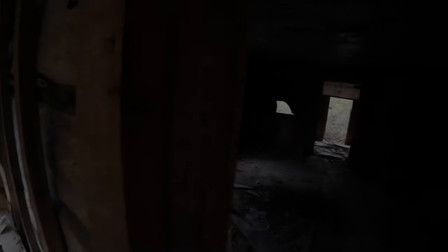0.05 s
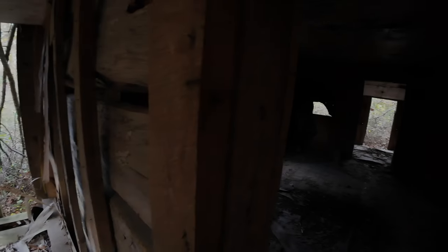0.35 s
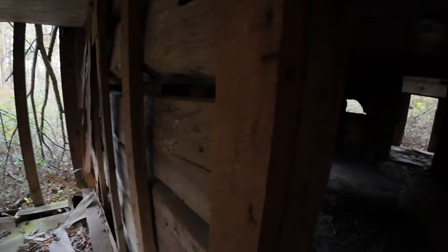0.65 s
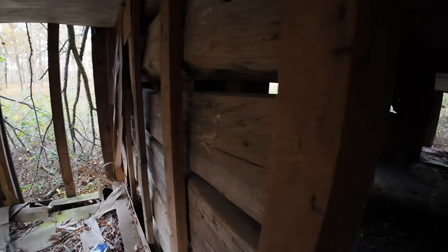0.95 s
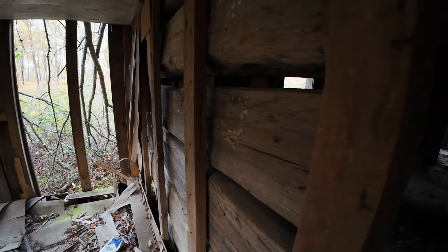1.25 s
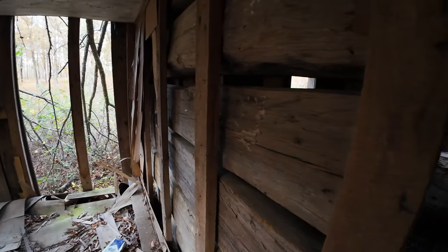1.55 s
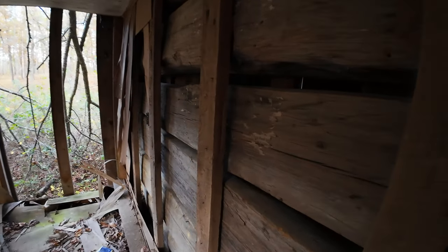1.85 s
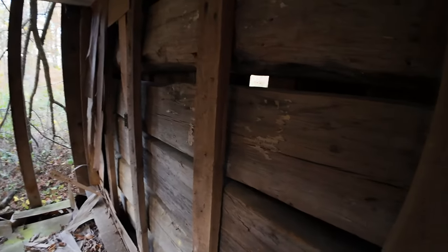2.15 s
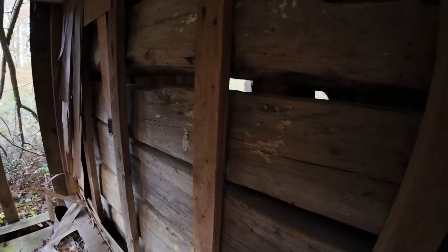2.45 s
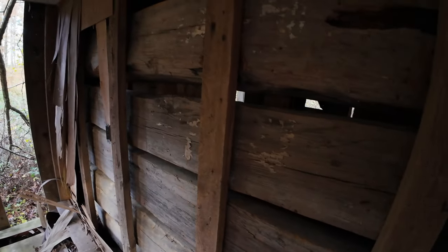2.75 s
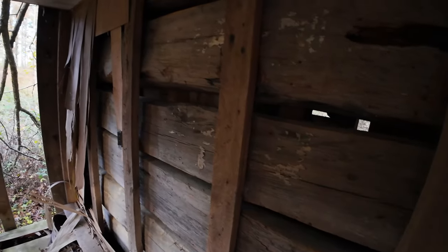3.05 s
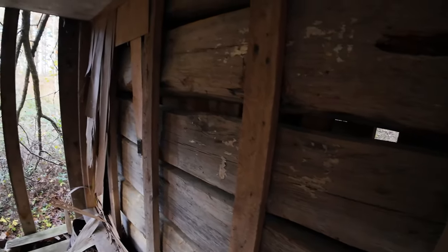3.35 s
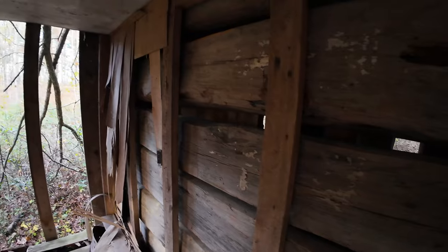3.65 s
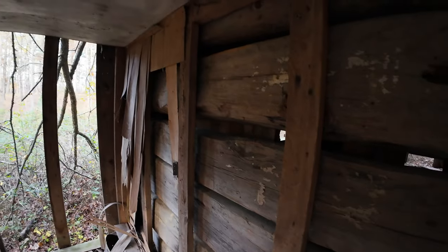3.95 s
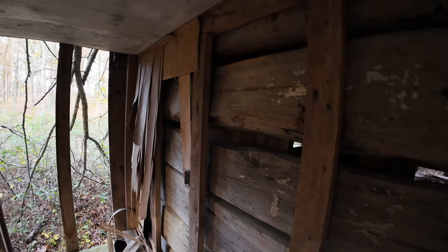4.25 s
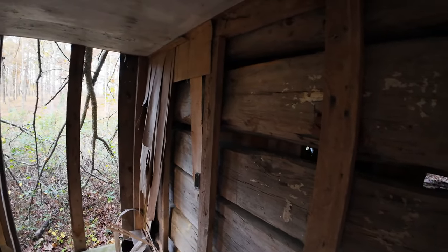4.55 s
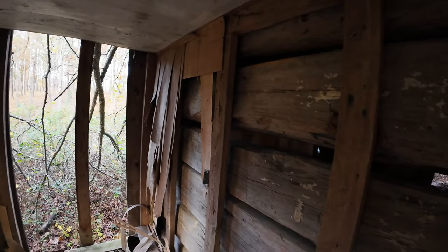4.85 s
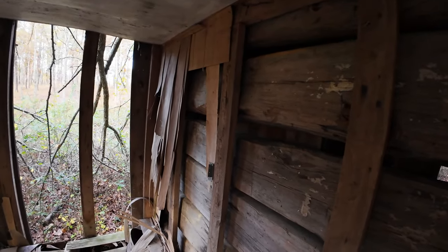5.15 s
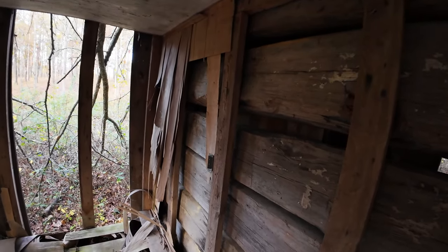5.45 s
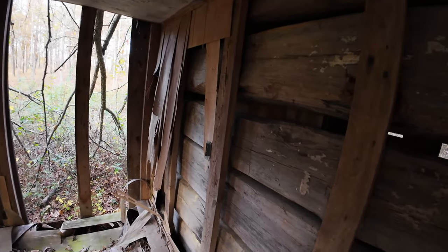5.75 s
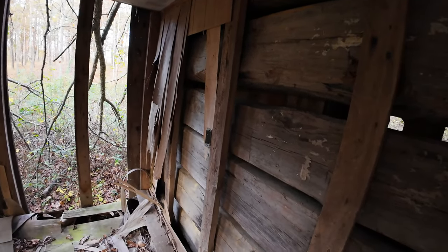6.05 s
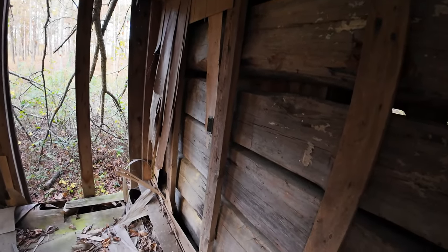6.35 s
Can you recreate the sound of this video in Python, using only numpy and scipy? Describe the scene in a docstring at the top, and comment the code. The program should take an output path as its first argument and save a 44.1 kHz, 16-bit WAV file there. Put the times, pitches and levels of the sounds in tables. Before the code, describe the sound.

Footsteps move over loose boards and dry litter, close to the microphone in a small derelict wooden room with a short echo. Soft thuds and knocks open, then a board cracks sharply at about 0.4 seconds. From 1.2 to 1.6 seconds a sole scrapes and crunches, with small splinters snapping. The loudest crack comes at 1.8 seconds, with a deep thud from the sagging floor. A sharp snap follows at 2.4 seconds, then a cluster of scuffs, hollow knocks, thuds and snaps from 2.7 to 3.3 seconds. After that the walker stands still. What remains is the quiet of the woods outside: soft moving air and faint insects rasping in threes over a distant insect chorus. A far animal clucks very faintly at about 3.9, 4.9 and 5.8 seconds, and a tiny insect peeps from 5.3 seconds until the end, just after 6 seconds.

```python
"""Footsteps on loose boards, close to a stereo pair of microphones inside a derelict wooden house.
Two boards crack against the joists, the sprung floor thuds and slats knock; soles scrape over wood
and dry litter and splinters snap, all with a short echo off the plank walls of the small open room.
Then the walker stands still, leaving the woods beyond the open wall: moving air, insects
rasping over a distant choir, a faint one peeping, and a far animal that clucks three times."""
import sys
import numpy as np
from scipy import signal
from scipy.fft import rfft, irfft, next_fast_len
from scipy.io import wavfile
from scipy.ndimage import uniform_filter1d

SR = 44100
rng = np.random.default_rng(int(sys.argv[2]) if len(sys.argv) > 2 else 0)


def dump(signal):
    """Clip the signal to [-1, 1] and save it as 16-bit WAV at the path in sys.argv[1]."""
    limited = np.clip(np.atleast_2d(signal).T, -1, 1)
    pcm = np.round(limited * 32767).astype(np.int16)
    wavfile.write(sys.argv[1], SR, pcm)


N = 281701
TIME = np.arange(N) / SR

# Loose boards slapping down. Each row: start in seconds, strength of the slap in dB, room echo and
# floor ring in dB relative to the slap, rebound delay in seconds.
BOARD_CRACKS = [(0.426, -4, -2.5, -31, .0035), (1.773, 1, -3, -24.5, .0038)]
# Colour of the first and the second slap. Each row: frequency in Hz, relative level in dB.
FIRST_SLAP_COLOUR = [(60, -21.5), (170, -26), (310, -9.5), (430, -7), (620, -1), (900, -1), (1150, -7.5),
                     (2000, -8.5), (3000, -14), (5500, -20), (7200, -28.5), (10000, -33), (14000, -31.5),
                     (16000, -41.5)]
SECOND_SLAP_COLOUR = [(60, -22), (160, -29.5), (260, -10), (400, -14), (560, -10), (880, -1.5), (1350, -10),
                      (2000, -15.5), (2800, -14.5), (5000, -21), (7000, -38.5), (10000, -31), (13500, -39),
                      (16000, -38.5)]
# Floorboard modes. Each row: frequency in Hz, relative level in dB, seconds to fall 60 dB.
FLOOR_MODES = [(195, -16, .3), (244, -15, .3), (534, -10, .26), (636, -10, .22), (805, -2, .24),
               (890, -2, .2), (988, -5, .22), (1070, -7, .17), (1215, -7, .2), (1416, -9, .18),
               (1541, -10, .22), (1995, -12, .2), (2426, -14, .2), (3612, -17, .18)]
# Weight landing on the sprung floor. Each row: start in seconds, level in dB, pitch in Hz.
FLOOR_THUDS = [(0.016, -41.5, 118), (0.067, -37, 116), (0.424, -38, 94), (1.255, -45, 134),
               (1.772, -27.5, 87), (1.801, -27, 45.6), (1.898, -32.5, 56.4), (2.14, -44, 63),
               (2.393, -33.5, 94.6), (2.897, -33.5, 65), (2.946, -38, 72.5)]
# Slats and sticks underfoot. Each row: start in seconds, peak in dB, lowest mode in Hz.
SLAT_KNOCKS = [(0.013, -39, 510), (0.067, -37.5, 405), (0.079, -35.5, 270), (0.123, -40.5, 1200),
               (0.164, -43.5, 718), (2.141, -50.5, 320), (2.396, -39.5, 650), (2.473, -40, 1090),
               (2.766, -38.5, 710), (2.896, -30.5, 552), (3.009, -35, 917), (3.122, -43.5, 2090)]
# Modes of a slat. Each row: multiple of the lowest mode, relative level in dB.
SLAT_MODES = [(0.998, -0.5), (1.27, -3), (2.199, -5), (2.901, -7), (4.4, -9.5)]
# Single sharp snaps. Each row: start in seconds, peak in dB, pitch in Hz, tearing time in seconds.
SPLINTER_SNAPS = [(0.0668, -34, 2870, 0.0012), (1.413, -34.5, 7800, 0.0046), (1.459, -35.5, 2900, 0.0031),
                  (1.481, -35, 4200, 0.0022), (1.5625, -30, 3860, 0.0014), (1.567, -39, 5400, 0.0024),
                  (1.598, -31.5, 3580, 0.0025), (2.136, -44.5, 3030, 0.0031), (2.4018, -21, 2376, 0.0015),
                  (2.4725, -34.5, 2480, 0.002), (2.757, -38.5, 4090, 0.0034), (2.7665, -32.5, 4900, 0.0046),
                  (2.87, -27, 5500, 0.0036), (2.916, -29.5, 1840, 0.0045), (2.9565, -33, 5800, 0.0051),
                  (3.0085, -33, 2840, 0.0053), (3.0476, -31.5, 10600, 0.0065),
                  (3.0688, -31.5, 4820, 0.0026), (3.1745, -35.5, 4400, 0.0053),
                  (3.2014, -28.5, 9550, 0.003), (3.294, -36, 4560, 0.0095)]
# A sole catching on a board. Each row: start and length in seconds, pitch in Hz, level in dB.
SOLE_DRAGS = [(0.0, 0.05, 1480, -55), (1.341, 0.1, 1500, -61), (1.42, 0.13, 859, -61),
              (1.5, 0.11, 2800, -59), (2.776, 0.074, 573, -49)]
# A sole presses, holds and lets go. Each row: start, swell and hold in seconds, rub on wood and
# crunch of litter in dB, weight on the foot from 0 to 1.
SOLE_STROKES = [ (0.0, 0.025, 0.016, -47.5, -67, 0.94), (0.056, 0.01, 0.073, -54, -63.5, 0.97),
                (0.663, 0.08, 0.018, -60.5, -83, 0.92), (1.17, 0.14, 0.016, -65, -66.5, 0.46),
                (1.313, 0.043, 0.076, -60.5, -54, 0.1), (1.42, 0.049, 0.12, -56, -53, 0.04),
                (1.633, 0.02, 0.22, -64, -67, 0), (1.856, 0.034, 0.056, -55, -73, 0.88),
                (1.988, 0.033, 0.29, -68.5, -79, 0.98), (2.36, 0.042, 0.001, -45, -65, 0.4),
                (2.451, 0.0094, 0.028, -55.5, -57.5, 0.9), (2.735, 0.043, 0.08, -45.5, -46.5, 0.38),
                (2.828, 0.051, 0.035, -40, -44, 0.47), (2.945, 0.054, 0.024, -54, -56, 0.15),
                (3.11, 0.016, 0.013, -60.5, -55, 0.64), (3.193, 0.008, 0.035, -59, -51.5, 0),
                (3.277, 0.026, 0.014, -56.5, -57, 0.4)]
# Wood rubbed by a heavy and a light foot. Each row: resonance and its width in Hz, relative gain in dB.
HEAVY_RUB_MODES = [(278, 110, -3.5), (604, 100, 2.5), (960, 250, -1), (1370, 450, -6), (2430, 690, -10)]
LIGHT_RUB_MODES = [(318.6, 160, -2.6), (845, 51, 0.68), (1420, 280, 0.59), (2705, 270, 1),
                   (3897, 400, -0.96)]
# Dry leaves and grit. Each row: frequency in Hz, relative spectral level in dB.
LITTER_COLOUR = [(500, -14.5), (1500, -7.5), (2700, -6.5), (4200, 2), (5500, 7.5), (7000, -1.5), (8200, 3),
                 (10000, 4.5), (11800, -2), (13600, 6.5), (15000, -4), (16200, -33)]
# Three-syllable rasping phrases of a near insect and a fainter one.
# Each row: middle of the first syllable in seconds, level in dB.
RASP_PHRASES = [(0.087, -66.5), (1.168, -63.5), (2.2, -64), (2.65, -65.5), (3.74, -70.5), (4.329, -63),
                (4.853, -65.5), (5.06, -77.5), (5.393, -67), (5.887, -66.5)]
# The three syllables of a phrase. Each row: delay in seconds, accent in dB.
RASP_SYLLABLES = [(0, -3.5), (.058, -1.5), (0.128, -1.5)]
# The far animal. Each entry: time of a cluck in seconds.
CLUCK_TIMES = [3.93, 4.886, 5.763]
# Woodland air and the far insect choir. Each row: frequency in Hz, relative spectral level in dB.
AIR_COLOUR = [(25, 6), (55, -5.5), (75, -9.5), (130, -14.5), (200, -23), (500, -27.5), (1000, -32.5),
              (2500, -37), (5700, -39.5), (7000, -46.5), (10000, -45), (11500, -52.5), (13500, -45.5),
              (16000, -54)]
CHOIR_COLOUR = [(3300, -21), (3750, -3), (4200, 3), (4450, 0.5), (4700, -25.5)]
# How alike the two microphones hear the foot, the room and the outdoors.
# Each row: frequency in Hz, left-right correlation.
FOOT_CORRELATION = [(2400, 1), (4500, .85), (8000, .35), (13000, .1)]
ROOM_CORRELATION = [(600, .985), (1200, .95), (2400, .87), (4500, .52), (8000, .1), (13000, -.15)]
AIR_CORRELATION = [(60, 0.02), (300, 0.21), (4000, 0.25), (8000, 0.02)]
# Echo of the plank room. Each row: frequency in Hz, seconds to fall 60 dB.
ROOM_DECAY = [(80, 0.75), (250, 0.28), (600, 0.2), (1200, 0.225), (3000, 0.24), (10000, 0.21)]
# Colour of the microphone pair. Each row: frequency in Hz, left minus right in dB.
MIC_BALANCE = [(1000, 0.5), (2000, 0.05), (4500, 2.5), (9000, -2), (13000, -3.5)]


def board_cracks(rebound_db=-4.5, dull_hz=2200, splinter_hz=5500, chatter_s=0.0032):
    """A nearby board slaps the joist and rebounds; splinters chatter, the floor and the room ring."""
    out, t = np.zeros((2, N)), seconds(.7)
    colours = [FIRST_SLAP_COLOUR, SECOND_SLAP_COLOUR]
    for (s, slap_db, room_db, ring_db, rebound_s), colour in zip(BOARD_CRACKS, colours):
        # bending waves carry the treble ahead of the bass
        slap = signal.lfilter([-.8, 1], [1, -.8], response(colour))
        slap = from_db(slap_db) * slap / np.abs(slap).max()
        add(out, s, filtered(slap, "low", splinter_hz))
        add(out, s + rebound_s, from_db(rebound_db) * filtered(slap, "low", dull_hz))
        # the treble comes from many tiny contacts within a few milliseconds
        contacts = stereo_noise(len(t), ROOM_CORRELATION) * np.exp(-t / chatter_s)
        chatter = rms_one(contacts) / np.sqrt(len(t))
        add(out, s, through(filtered(slap, "high", splinter_hz), chatter))
        add(out, s, room_echo(slap, room_db, build_s=0.0081))
        for hz, mode_db, t60 in FLOOR_MODES:
            # the ring swells as the blow spreads along the boards
            swell = rng.choice([-1, 1]) * (1 - np.exp(-t / 0.0057))
            gain = from_db(slap_db + ring_db + mode_db + rng.normal(0, 0.83))
            add(out, s, gain * swell * ring(t, hz, t60))
    return out


def floor_thuds(press_s=0.006, wobble=0.1, rumble_db=-3, t60_cycles=12):
    """The floor sags under a soft sole and swings unevenly; the loose boards around it rumble along."""
    out, t = np.zeros((2, N)), seconds(1)
    for s, level_db, hz in FLOOR_THUDS:
        uneven_time = np.cumsum(1 + wobble * wander(len(t), smooth=600)) / SR
        rumble = rms_one(resonance(rng.standard_normal(len(t)), hz, quality=.9))
        swing = np.sin(2 * np.pi * hz * uneven_time) + from_db(rumble_db) * rumble
        envelope = from_db(level_db - 60 * t * hz / t60_cycles) * (1 - np.exp(-t / press_s))
        add(out, s, envelope * swing)
    return out


def slat_knocks(t60_at_1khz_s=0.051, contact_s=0.00032):
    """A slat is struck and rings briefly and hollowly; small ones ring higher and shorter."""
    out, t = np.zeros(N), seconds(.15)
    for s, peak_db, lowest_hz in SLAT_KNOCKS:
        knock = 0
        for multiple, mode_db in SLAT_MODES:
            hz = lowest_hz * multiple
            gain = from_db(mode_db + rng.normal(0, 1.5)) * rng.choice([-1, 1])
            knock = knock + gain * ring(t, hz, t60_at_1khz_s / np.sqrt(hz / 1000))
        knock = knock * (1 - np.exp(-t / contact_s))
        add(out, s, from_db(peak_db) * knock / np.abs(knock).max())
    return out + room_echo(out, level_db=-6, build_s=.004)


def splinter_snaps(rows, fibres_db=4, full_grit_hz=4577, grit_db_per_octave=15.5):
    """A splinter tears fibre by fibre within milliseconds: a broad resonance plus bright grit."""
    out, t = np.zeros((2, N)), seconds(.03)
    litter = response(LITTER_COLOUR)[:len(t)]
    for s, peak_db, hz, tear_s in rows:
        fibres = from_db(fibres_db * wander(len(t), smooth=20))
        tear = stereo_noise(len(t), FOOT_CORRELATION) * fibres * np.exp(-t / tear_s)
        body = rms_one(resonance(tear, hz, quality=0.98))
        grit = rms_one(through(tear, litter)[:, :len(t)])
        # smaller splinters are higher and grittier
        grit_db = min(grit_db_per_octave * np.log2(hz / full_grit_hz), 0)
        snap = body + from_db(grit_db) * grit
        add(out, s, from_db(peak_db) * snap / np.abs(snap.mean(axis=0)).max())
    return out + room_echo(out, level_db=-5, build_s=0.0026)


def random_splinters(crunch, per_s=24, threshold_db=-49, above_crunch_db=12, spread_db=4.5,
                     centre_hz=3220, tear_s=0.0054):
    """Splinters snap at random where the sole crunches hardest; rows as in SPLINTER_SNAPS."""
    at = np.flatnonzero((rng.random(N) < per_s / SR) & (crunch > from_db(threshold_db)))
    size, octaves = rng.standard_normal((2, N))[:, at]
    peak_db = 20 * np.log10(crunch[at]) + above_crunch_db + spread_db * size
    hz = np.minimum(centre_hz * 2 ** octaves, SR / 4)
    return list(zip(at / SR, peak_db, hz, np.full(len(at), tear_s)))


def sole_drags(waver=.035):
    """Quick uneven slips set one board ringing; it swells, wavers and fades as the sole passes."""
    out = np.zeros(N)
    for s, length_s, hz, level_db in SOLE_DRAGS:
        t = seconds(length_s)
        slipping = rng.standard_normal(len(t)) * (rng.random(len(t)) < hz / SR)
        uneven_time = np.cumsum(1 + waver * wander(len(t), smooth=600)) / SR
        tone = np.interp(uneven_time, t, resonance(slipping, hz, quality=6), right=0)
        add(out, s, from_db(level_db) * rms_one(tone * np.sin(np.pi * t / length_s)))
    return out + room_echo(out, level_db=-8, build_s=0.0023)


def sole_scuffs(heavy, light, crunch):
    """Close to the microphones, the sole stutters over wood and crushes dry leaves and grit."""
    heavy_rub = rubbed_wood(slips(per_s=1400, size_db=0.5), HEAVY_RUB_MODES)
    light_rub = rubbed_wood(slips(per_s=4000, size_db=-0.5), LIGHT_RUB_MODES)
    leaves = rms_one(through(slips(per_s=2800, size_db=2.8), response(LITTER_COLOUR)))
    direct = heavy * heavy_rub + light * light_rub + crunch * leaves
    return direct + room_echo(direct, level_db=-10, build_s=0.00061)


def stroke_gains(rub_t60_s=0.11, crunch_t60_s=0.125):
    """Heavy rub, light rub and crunch over time; weight shifts the rub to the deeper resonances."""
    heavy, light, crunch = np.zeros((3, N))
    for s, swell_s, hold_s, rub_db, crunch_db, weight in SOLE_STROKES:
        rub = from_db(rub_db) * pressure(s, swell_s, hold_s, rub_t60_s)
        heavy += np.sqrt(weight) * rub
        light += np.sqrt(1 - weight) * rub
        crunch += from_db(crunch_db) * pressure(s, swell_s, hold_s, crunch_t60_s)
    return heavy, light, crunch


def pressure(s, swell_s, hold_s, t60):
    """Gain of one stroke: a smooth swell, a hold and an exponential release."""
    rise = np.sin(np.pi / 2 * np.clip((TIME - s) / swell_s, 0, 1)) ** 2
    return rise * from_db(-60 * np.clip((TIME - s - swell_s - hold_s) / t60, 0, 10))


def slips(per_s, size_db, clump_db=2.6):
    """Tiny stereo clicks of uneven size, coming in clumps as the sole catches and lets go."""
    shape = (2, next_fast_len(N))
    sizes = from_db(size_db * np.minimum(rng.exponential(1, shape), 4)) * rng.choice([-1, 1], shape)
    clumps = from_db(clump_db * rms_one(uniform_filter1d(rng.standard_normal(shape[1]), size=260)))
    slipping = rng.random(shape) < per_s / SR
    return spread(clumps * sizes * slipping, FOOT_CORRELATION)[:, :N]


def rubbed_wood(clicks, modes, drift_db=2.5):
    """Parallel resonances of alternating sign, each coming and going as the contact moves; rms 1."""
    out = 0
    for k, (hz, width_hz, db) in enumerate(modes):
        gain = (-1) ** k * from_db(db + drift_db * wander(N, smooth=2200))
        out = out + gain * signal.lfilter(*signal.iirpeak(hz, hz / width_hz, fs=SR), clicks)
    return rms_one(out)


def insects(peeps_from_s=5.32, peep_every_s=.215, peep_db=-79, far_per_s=9.7):
    """A near insect and a fainter one rasp in threes, a higher one peeps, far ones call at random."""
    syllables = [(s + delay_s, db + accent_db)
                 for s, db in RASP_PHRASES for delay_s, accent_db in RASP_SYLLABLES]
    rasps = calls(syllables, hz=4370, length_s=.046, fall=.29, top_at=.35, waver=.007)
    peep_rows = [(peeps_from_s + k * peep_every_s, peep_db) for k in range(5)]
    peeps = calls(peep_rows, hz=5200, length_s=0.018, fall=.08, top_at=0.44, waver=0.0045)
    far_s = np.flatnonzero(rng.random(N) < far_per_s / SR) / SR
    far_db = rng.normal(-81.5, 4.5, len(far_s))
    far_rasps = calls(zip(far_s, far_db), hz=4280, length_s=.046, fall=.2, top_at=.35, waver=.02)
    return rasps + peeps + far_rasps


def animal_clucks(level_db=-65):
    """An animal far off in the woods gives three short, falling notes."""
    rows = [(s, level_db) for s in CLUCK_TIMES]
    return calls(rows, hz=1050, length_s=.03, fall=.15, top_at=-.2, waver=.006)


def calls(rows, hz, length_s, fall, top_at, waver):
    """Short fluttering tones on an arch of pitch whose top lies at the fraction top_at of each call."""
    out, t = np.zeros(N), seconds(length_s)
    along = t / length_s
    swell = np.sin(np.pi * along) ** 1.4
    for middle_s, level_db in rows:
        glide = fall * rng.uniform(.8, 1.2) * (along - top_at) ** 2
        pitch = hz * (1 - glide + waver * (rng.normal() + wander(len(t), smooth=60)))
        tone = np.sqrt(2) * np.sin(2 * np.pi * np.cumsum(pitch) / SR)
        flutter_db = 2 * wander(len(t), smooth=200)
        add(out, middle_s - length_s / 2, from_db(level_db + flutter_db) * swell * tone)
    return out


def woods(air_db=-55.5, lean_left_db=1, choir_db=-81):
    """Single callers, a far insect choir and moving air reach the microphones through the open wall."""
    callers = insects() + animal_clucks()
    echo = room_echo(callers, level_db=-7, build_s=0.0056)
    choir = from_db(choir_db) * outdoor_noise(CHOIR_COLOUR)
    air = from_db([[air_db + lean_left_db], [air_db - lean_left_db]]) * outdoor_noise(AIR_COLOUR)
    return callers + echo + choir + air


def outdoor_noise(colour):
    """Steady coloured noise, wide between the microphones; rms 1."""
    size = next_fast_len(N)
    gain = from_db(at_hz(colour, np.fft.rfftfreq(size, 1 / SR)))
    return rms_one(irfft(rfft(stereo_noise(size, AIR_CORRELATION)) * gain, size)[:, :N])


def room_echo(sound, level_db, build_s, size=32768):
    """Dense echoes off the plank walls build up quickly and die band by band."""
    t, hz = np.arange(size) / SR, np.fft.rfftfreq(size, 1 / SR)
    white = rfft(stereo_noise(size, ROOM_CORRELATION))
    centres, t60s = np.transpose(ROOM_DECAY)
    tail = 0
    for share, t60 in zip(np.eye(len(centres)), t60s):
        band = irfft(white * at_hz(np.column_stack([centres, share]), hz))
        tail = tail + band * from_db(-60 * t / t60)
    tail = tail * (1 - np.exp(-(t / build_s) ** 2))
    return from_db(level_db) * through(sound, rms_one(tail) / np.sqrt(size))


def response(colour, size=8192):
    """The causal, most compact impulse response with this colour; energy 1."""
    cepstrum = irfft(np.log(from_db(at_hz(colour, np.fft.rfftfreq(size, 1 / SR)))))
    cepstrum[1:size // 2] *= 2
    cepstrum[size // 2 + 1:] = 0
    pulse = irfft(np.exp(rfft(cepstrum)))
    return pulse / np.linalg.norm(pulse)


def spread(pair, correlation):
    """Mix two unrelated signals into left and right, as alike at each frequency as the table says."""
    mid, side = rfft(pair)
    size = pair.shape[-1]
    alike = np.clip(at_hz(correlation, np.fft.rfftfreq(size, 1 / SR)), -.99, .99)
    return irfft(np.sqrt((1 + alike) / 2) * mid + np.sqrt((1 - alike) / 2) * side * [[1], [-1]], size)


def stereo_noise(count, correlation):
    return spread(rng.standard_normal((2, count)), correlation)


def wander(count, smooth):
    """A random wobble, smoothed over `smooth` samples; spread about 1."""
    return rms_one(uniform_filter1d(rng.standard_normal(N), size=smooth))[:count]


def resonance(x, hz, quality):
    """Two passes through the same resonant band."""
    band = signal.iirpeak(hz, quality, fs=SR)
    return signal.lfilter(*band, signal.lfilter(*band, x))


def filtered(x, kind, hz):
    return signal.lfilter(*signal.butter(2, hz, kind, fs=SR), x)


def through(x, pulse):
    return signal.fftconvolve(np.atleast_2d(x), np.atleast_2d(pulse), axes=-1)[:, :N]


def ring(t, hz, t60):
    return np.sin(2 * np.pi * hz * t) * from_db(-60 * t / t60)


def at_hz(points, hz):
    """Read a table on a log-frequency axis."""
    known_hz, values = np.transpose(points)
    return np.interp(np.log(np.maximum(hz, 1)), np.log(known_hz), values)


def add(out, s, sound):
    """Mix a sound in from time s."""
    start = max(round(s * SR), 0)
    part = sound[..., :N - start]
    out[..., start:start + part.shape[-1]] += part


def seconds(length):
    return np.arange(int(length * SR)) / SR


def from_db(db):
    return 10 ** (np.asarray(db) / 20)


def rms_one(x):
    return x / np.sqrt(np.mean(x ** 2) + 1e-20)


def scene():
    """The walker close by in the room, the woods far behind."""
    heavy, light, crunch = stroke_gains()
    floor = board_cracks() + floor_thuds() + slat_knocks()
    splinters = splinter_snaps(SPLINTER_SNAPS + random_splinters(crunch))
    soles = sole_drags() + sole_scuffs(heavy, light, crunch)
    return floor + splinters + soles + woods()


def record(dry, cutoff_hz=16200):
    """Each microphone has its own colour; the highest peak is rounded and the top is cut steeply."""
    size = next_fast_len(N + SR)
    lean_db = at_hz(MIC_BALANCE, np.fft.rfftfreq(size, 1 / SR)) / 2
    heard = irfft(rfft(dry, size) * from_db([lean_db, -lean_db]), size)[:, :N]
    top_cut = signal.ellip(12, .1, 100, cutoff_hz, fs=SR, output="sos")
    return signal.sosfilt(top_cut, np.tanh(heard))


dry = scene()
out = record(dry)
dump(out)
```